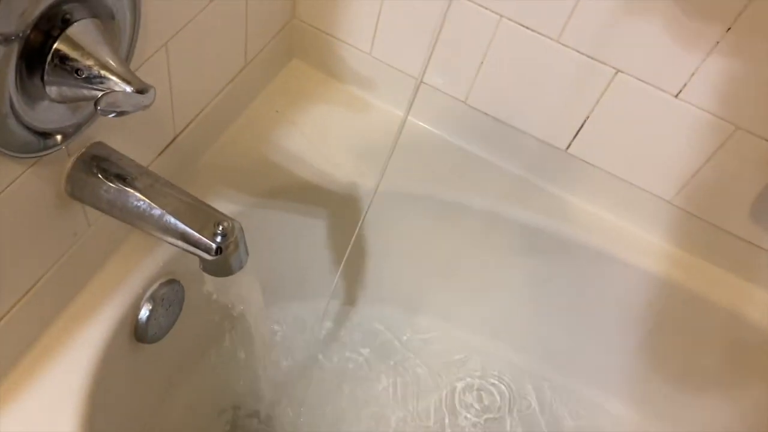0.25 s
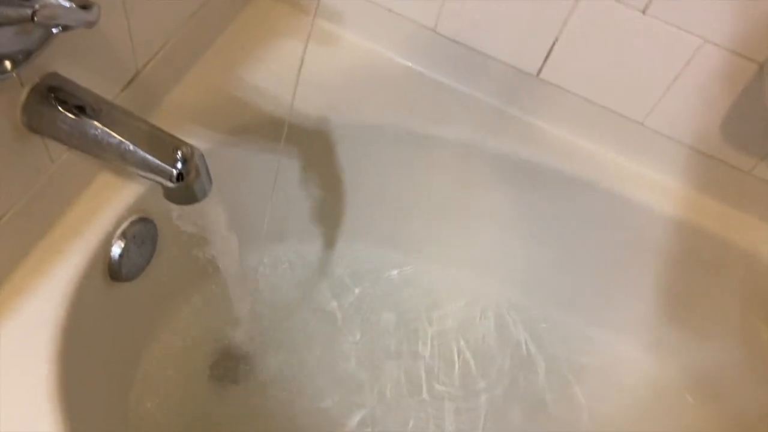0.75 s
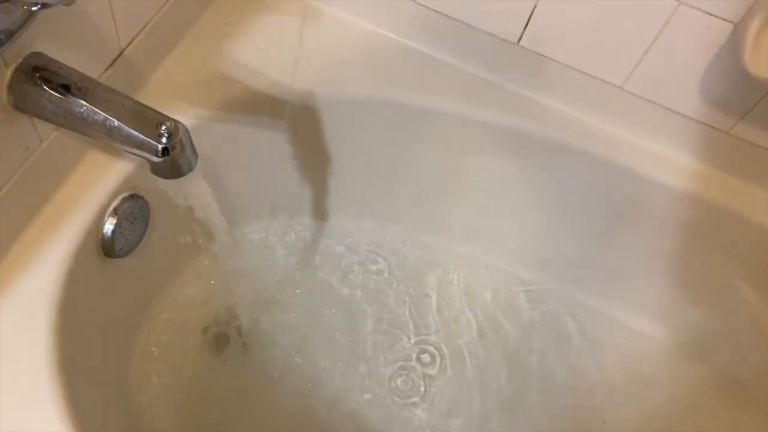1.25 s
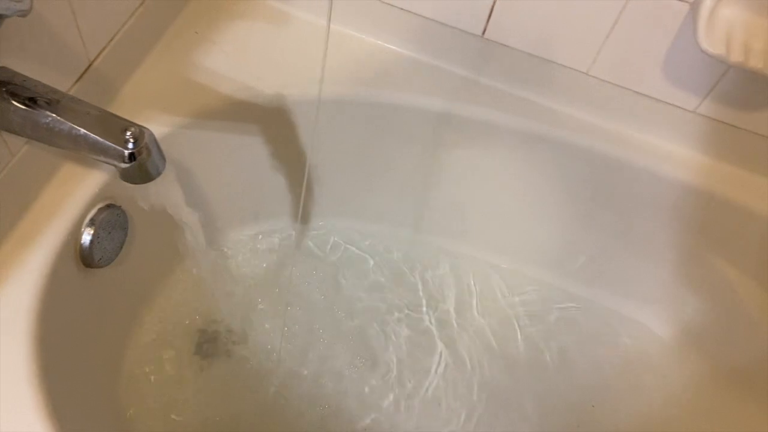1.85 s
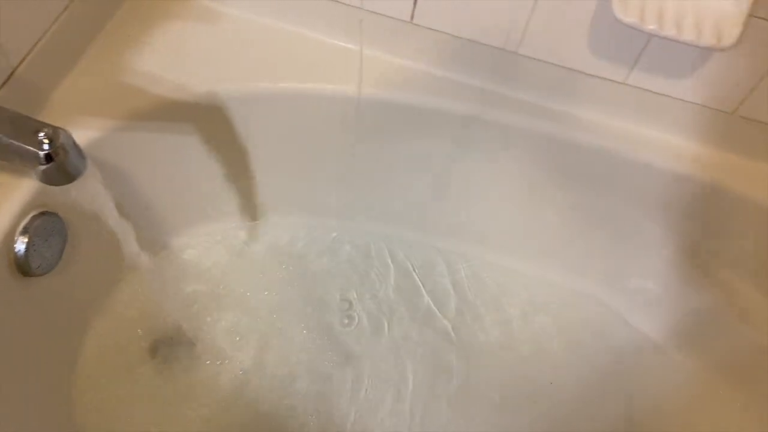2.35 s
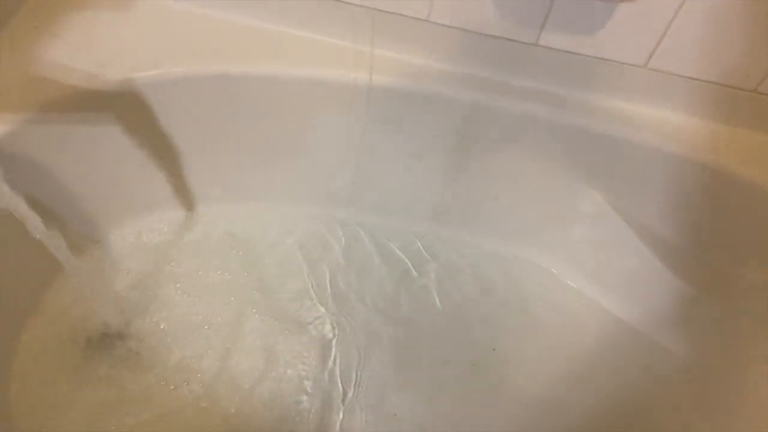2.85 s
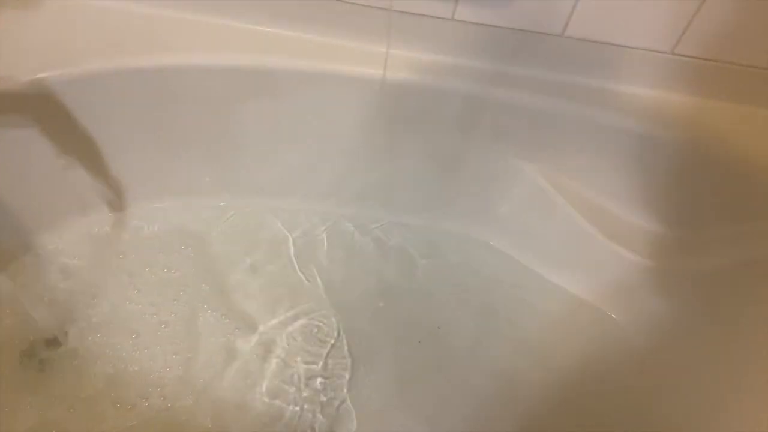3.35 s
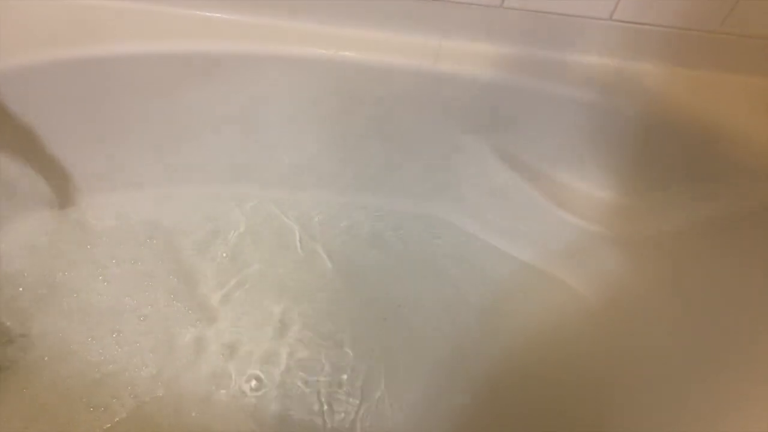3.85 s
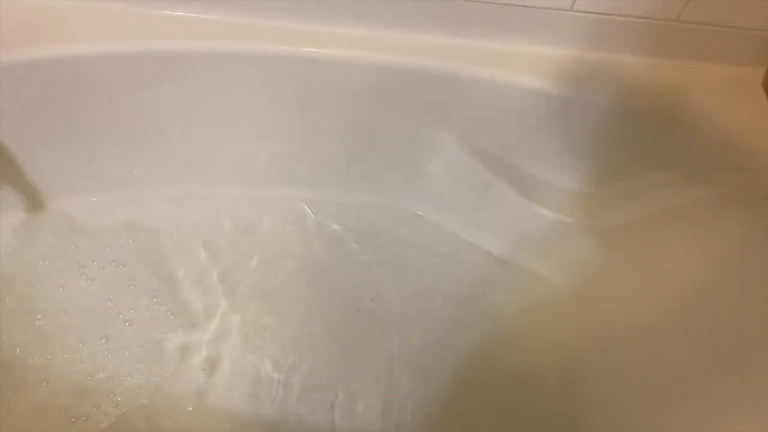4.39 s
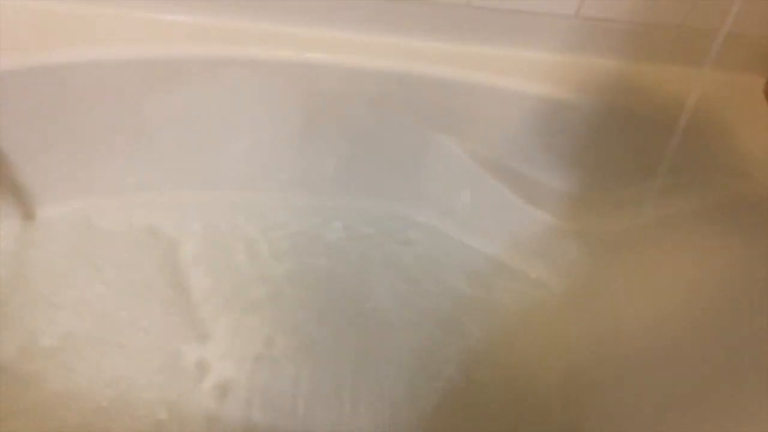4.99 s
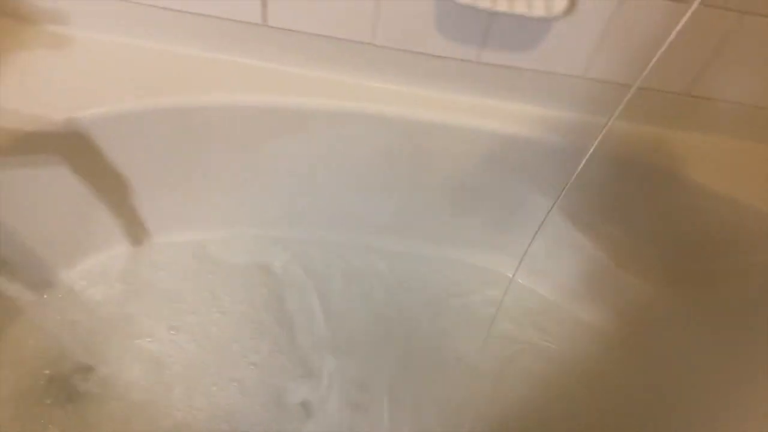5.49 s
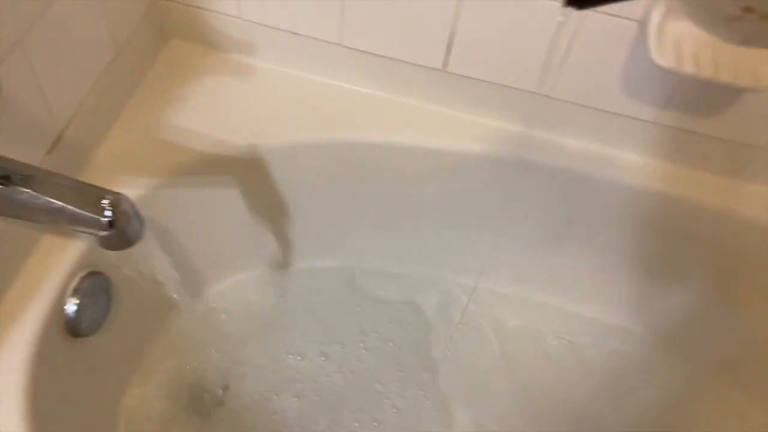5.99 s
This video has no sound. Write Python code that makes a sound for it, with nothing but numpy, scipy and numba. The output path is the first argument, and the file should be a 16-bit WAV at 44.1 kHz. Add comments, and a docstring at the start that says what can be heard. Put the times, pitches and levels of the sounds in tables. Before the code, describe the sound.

Heard from close by in a small tiled bathroom, a strong stream of water pours from a faucet into a filling bathtub without a break. The plunging water makes a hollow rumble beneath bright bubbling and crackling spray. Sharp splashes stand out at first, followed by irregular gurgles, smaller slaps and gulps of air, and the low churning grows briefly just before the end.

```python
"""A bathtub faucet runs at full flow into a filling tub in a tiled bathroom.
From the outset the jet drives air under the water, which booms in the tub and room, while clouds of
bubbles ring and fine spray crackles. In the first second lumps of the jet slap the surface hardest.
Slaps, gurgles and gulps of air then recur unevenly over the steady rush. Near six seconds the
churning swells, and a last gulp booms."""
import sys
import numpy as np
from scipy import signal
from scipy.fft import rfft, irfft, next_fast_len
from scipy.io import wavfile
from scipy.ndimage import uniform_filter1d, map_coordinates
from numba import njit

SR = 44100
rng = np.random.default_rng(int(sys.argv[2]) if len(sys.argv) > 2 else 0)


def unload_audio(sound):
    """Save the sound as a 16-bit wav file, at the path given as the first command line argument."""
    columns = np.transpose(np.atleast_2d(sound))
    # keep every value between -1 and 1, then stretch to whole-number steps
    steps = np.round(np.clip(columns, -1, 1) * 32767)
    wavfile.write(sys.argv[1], SR, steps.astype(np.int16))


N = 274743


def gain_of(db):
    """The decibel scale: 20 dB is a factor of ten in amplitude."""
    return 10 ** (np.asarray(db) / 20)


def unit_rms(x):
    """Normalisation to a mean power of one."""
    return x / np.sqrt(np.mean(x ** 2) + 1e-20)


def curve_at(points, hz):
    """Linear interpolation of (Hz, value) points on a logarithmic frequency axis."""
    point_hz, value = np.transpose(points)
    return np.interp(np.log(hz + 1), np.log(point_hz + 1), value)


def filtered(x, response):
    """Linear filtering: the spectrum is multiplied by a frequency response."""
    size = next_fast_len(x.shape[-1] + 4096, True)
    spectrum = rfft(x, size) * response(np.fft.rfftfreq(size, 1 / SR))
    return irfft(spectrum, size)[..., :x.shape[-1]]


def coloured(x, points):
    """Spectral shaping by a curve of (Hz, dB) points."""
    return filtered(x, lambda hz: gain_of(curve_at(points, hz)))


def split(x, edges_hz):
    """Complementary filtering: neighbouring bands that sum to the whole."""
    lows = [filtered(x, lambda hz: 1 / (1 + (hz / edge) ** 12)) for edge in edges_hz]
    return np.diff([0 * x, *lows, x], axis=0)


def wander(per_s):
    """Random modulation of rms 1, gliding to a new value per_s times a second."""
    steps = rng.standard_normal(4096)
    return unit_rms(np.interp(np.arange(N) / SR * per_s, np.arange(len(steps)), steps))


def add(mix, start_s, sound):
    """Superposition: a signal joins the mix at its starting time."""
    part = mix[:, max(round(start_s * SR), 0):][:, :sound.shape[1]]
    part += sound[:, :part.shape[1]]


def impacts(per_s, spread_db, size=N):
    """A Poisson process: clicks of uneven strength, with a random sign in each channel."""
    at = np.flatnonzero(rng.random(size) < per_s / SR)
    strength = gain_of(spread_db * np.minimum(rng.exponential(1, len(at)), 4))
    train = np.zeros((2, size))
    train[:, at] = strength * rng.choice([-1, 1], (2, len(at)))
    return train


@njit
def damped_tones(start, turn, fade, glide, strength, size):
    """Damped oscillators as shrinking phasors that turn ever faster; time is counted in samples."""
    out = np.zeros((2, size))
    for k in range(len(start)):
        phasor = 1 + 0j
        step, bend = np.exp(1j * turn[k] - fade[k]), np.exp(1j * glide[k])
        for n in range(start[k], min(start[k] + int(5 / fade[k]), size)):
            phasor *= step
            step *= bend
            out[0, n] += strength[k, 0] * phasor.imag
            out[1, n] += strength[k, 1] * phasor.imag
    return out


def bubbles(birth_s, hz, amplitude, cycles, rise):
    """Bubble resonance: in `cycles` periods a tone falls to 1/e and sharpens by the fraction `rise`."""
    turn, fade = 2 * np.pi * hz / SR, hz / (SR * cycles)
    glide = turn * fade * rise  # pitch climbs as the bubble nears the surface
    strength = (2 * np.sqrt(fade) * amplitude)[:, None] * rng.choice([-1, 1], (len(birth_s), 2))
    return damped_tones((birth_s * SR).astype(np.int64), turn, fade, glide, strength, N)


def echoes(tub_db=-4.0, tub_t60_s=0.075, room_db=-6, room_t60_s=0.25):
    """Impulse response from one spot on the water: quick tub reflections and the tiled room's decay."""
    t = np.arange(SR // 3) / SR
    response = np.zeros((2, len(t)))
    for db, t60 in [(tub_db, tub_t60_s), (room_db, room_t60_s)]:
        taps = impacts(3000, 0, size=len(t)) * (t > .0015) * gain_of(-60 * t / t60)
        response += gain_of(db) * taps / np.linalg.norm(taps, axis=1, keepdims=True)
    return response


def bathroom(direct, shifts_per_s=9, spots=6):
    """Time-varying reverberation: the echoes change as the splashing shifts about on the water."""
    shares = np.array([wander(shifts_per_s) for _ in range(spots)])
    shares /= np.linalg.norm(shares, axis=0)
    return direct + sum(signal.oaconvolve(direct * share, echoes(), axes=1)[:, :N] for share in shares)


def stereo_image(pair):
    """Coherence: left and right are partly alike; in the high treble they are fully alike,
    alternately in phase and opposite."""
    # Each row: frequency in Hz, coherence (clipped to 0-1 below).
    coherence = [(60, 1.5), (140, 0.77), (300, 0.92), (550, 0.52), (800, 0.22), (950, 0.4), (1120, 0),
                 (1350, 0.52), (1600, 0.3), (1750, 0.44), (2200, 0.26), (2550, 0.8), (3400, 0.36),
                 (4600, 0.65), (5600, 0.1), (6300, 0.27), (7100, 1), (8300, 0.3), (8500, 3), (15000, 3)]
    # Each row: frequency in Hz, left minus right phase in radians.
    phase_difference = [(0, 0), (520, 0.7), (950, 0.7), (1460, -3.5), (2580, -6.0), (7410, -6.3),
                        (8350, -9.1), (9650, -9.7), (10500, -12.5), (11700, -12.6), (12600, -15.5),
                        (14000, -15.9), (14600, -18.9), (16500, -18.8)]
    # Each row: frequency in Hz, left minus right level in dB.
    balance = [(60, -0.5), (110, -3), (200, 0), (380, -2), (750, 3), (1000, 2), (1250, 0.5), (1700, 1.2),
               (2200, 4.5), (2700, 1.5), (4800, 2.5), (8120, 1.5), (15000, 0)]
    alike = lambda hz: np.clip(curve_at(coherence, hz), 0, 1)
    rotation = lambda hz: np.exp(-1j * np.interp(hz, *np.transpose(phase_difference)))
    tilt = lambda hz: gain_of(np.array([[.5], [-.5]]) * curve_at(balance, hz))
    left, unrelated = pair
    right = filtered(left, lambda hz: alike(hz) * rotation(hz))
    right += filtered(unrelated, lambda hz: np.sqrt(1 - alike(hz) ** 2))
    return filtered(np.array([left, right]), tilt)


def foam(flutter_db=1, flutters_per_s=110):
    """Incoherent summation: foam too fine to tell apart is noise that flutters with the jet."""
    return unit_rms(rng.standard_normal((2, N)) * gain_of(flutter_db * wander(flutters_per_s)))


def spray(per_s, spread_db, bursts_per_s, burst_db, burst_s, drizzle):
    """Shot noise: drops tick on the water in short bursts over a steady drizzle."""
    age = np.arange(SR // 16) / SR / burst_s
    onsets = abs(impacts(bursts_per_s, burst_db)[0])
    bursts = signal.oaconvolve(onsets, np.sqrt(age) * np.exp(-age))[:N]
    return unit_rms(impacts(per_s, spread_db) * (drizzle + unit_rms(bursts)))


def plinks(level_db=-14, middle_hz=2600, octaves=1.15, spread_db=3.0, count=700):
    """Light damping: single clean bubbles at the edge of the foam ring longer than the rest."""
    when, down, up, luck = rng.random((count, 4)).T
    hz = middle_hz * 2 ** (octaves * (up - down))
    amplitude = gain_of(-spread_db * np.log(np.maximum(luck, .15)))
    return gain_of(level_db) * unit_rms(bubbles(when * N / SR, hz, amplitude, cycles=34, rise=0.0278))


def churn(lowest_hz=340, spread_db=3, cloud_db=1.43, clouds_per_s=35, clouds_per_octave=2.52,
          count=36000):
    """A broad population of resonators: bubbles of neighbouring sizes are born in short clouds."""
    when, height, luck = rng.random((count, 3)).T
    birth_s, octave = when * N / SR, height * 5
    hz = lowest_hz * 2 ** octave
    place = [birth_s * clouds_per_s, octave * clouds_per_octave]
    clouds = map_coordinates(rng.standard_normal((1024, 64)), place, order=1, mode="wrap")
    db = cloud_db * np.minimum(clouds, 2) - spread_db * np.log(np.maximum(luck, .03))
    amplitude = np.sqrt(hz) * gain_of(db)  # equal energy per Hz on average
    return unit_rms(bubbles(birth_s, hz, amplitude, cycles=10, rise=0.0495))


def steady_rush():
    """Independent sources add in power: foam, bubbles, drops and mist each fill part of the spectrum."""
    # Each row of these four spectra: frequency in Hz, gain in dB.
    foam_share = [(400, -0.5), (1500, -2.5), (4000, -2), (8000, -4.5), (15000, 2)]
    bubble_share = [(400, -3), (1500, -2), (4000, -4.5), (8000, -2.5), (15000, -5)]
    drop_share = [(400, -18), (1500, -9.5), (4000, -4), (7000, -1.5), (10000, -13), (15000, -15)]
    mist_share = [(400, -39), (4000, -18), (8000, -1), (11000, -2.5), (15000, 0)]
    drops = spray(per_s=5000, spread_db=5.0, bursts_per_s=110, burst_db=2.0, burst_s=0.0033, drizzle=0.61)
    mist = spray(per_s=4000, spread_db=3.0, bursts_per_s=99, burst_db=3.0, burst_s=0.0016, drizzle=0.5)
    layers = [(foam(), foam_share), (churn(), bubble_share), (drops, drop_share), (mist, mist_share)]
    return sum(coloured(layer, share) for layer, share in layers)


def surging(water, shared_db=0.44, own_db=0.43, swings_per_s=32, width_octaves=1.23):
    """Amplitude modulation by band: each lurch of the jet lifts the bubbles near one pitch."""
    # Each row: peak time in seconds, half-length in seconds, swell in dB, middle pitch in Hz.
    surges = [(0.05, 0.07, 5, 1300), (0.37, 0.047, 4.5, 800), (0.567, .1, 1.5, 5000),
              (0.765, 0.084, 3.2, 3600), (0.98, 0.049, 1.5, 2200), (1.21, 0.12, 1, 2100),
              (1.488, 0.29, 1.5, 1900), (2.14, 0.039, 1.5, 2600), (2.97, .06, 3, 750),
              (3.153, 0.052, 4, 1700), (3.452, 0.056, 4.5, 1800), (3.808, 0.049, 4, 1500),
              (4.23, 0.053, 3.5, 600), (4.6, 0.11, 1, 4200), (4.746, 0.032, 3.5, 700),
              (4.827, 0.095, 2.3, 2200), (5.228, 0.078, 1, 1600), (5.4, 0.075, 2.5, 700),
              (5.573, 0.041, 2.5, 4000), (5.87, 0.49, 0, 1600)]
    # Each row: time in seconds, slow level change of the breaking water in dB.
    pour = [(0, 0.4), (1.35, 0.5), (1.8, -0.34), (2.35, -0.3), (3.2, -1), (3.95, -0.56), (4.7, -0.1),
            (5.5, -0.8), (6.23, 0)]
    # Each entry: centre of a band in Hz.
    band_centres = [600, 1200, 2400, 4800, 9600]
    t, centres = np.arange(N) / SR, np.array(band_centres)
    peak_s, half_s, db, hz = np.transpose(surges)
    time_weight = np.maximum(1 - abs(t - peak_s[:, None]) / half_s[:, None], 0)
    band_weight = np.exp(-.5 * (np.log2(centres[:, None] / hz) / width_octaves) ** 2)
    swells_db = (band_weight * db) @ time_weight + np.interp(t, *np.transpose(pour))
    swells_db += shared_db * wander(swings_per_s)
    bands = split(water, np.sqrt(centres[1:] * centres[:-1]))
    return sum(band * gain_of(swell + own_db * wander(swings_per_s))
               for band, swell in zip(bands, swells_db))


def spits(level_db=7, fade_s=.004, per_s=4000, highpass_hz=7000):
    """Impact noise: each handful of drops thrown onto the surface lands as a brief, bright crackle."""
    # Each row: time in seconds, relative level in dB.
    handfuls = [(0.112, 16.5), (0.62, 8), (0.695, 15), (0.735, 9), (0.767, 6), (0.908, 9), (0.929, 14),
                (1.34, 10), (1.737, 15), (1.832, 16), (2.511, 17), (2.604, 14), (3.004, 14), (3.307, 8),
                (3.547, 16), (3.589, 14), (3.629, 14), (3.876, 12), (3.987, 12), (4.056, 16), (4.083, 17),
                (4.382, 12), (4.457, 16), (4.577, 9), (5.011, 12), (5.316, 10), (5.374, 17.5), (5.442, 9),
                (5.568, 13), (6.122, 15), (6.2, 12)]
    out, age = np.zeros((2, N)), np.arange(SR // 16) / SR / fade_s
    for time_s, db in handfuls:
        ticks = unit_rms(impacts(per_s, spread_db=1.1, size=len(age)))
        add(out, time_s - fade_s / 2, gain_of(db + level_db) * ticks * age * np.exp(-age))
    return filtered(out, lambda hz: hz ** 2 / (hz ** 2 + highpass_hz ** 2))


def gurgles(level_db=-0.8, taper=0.25, count=24):
    """Size sets pitch: trapped air breaks into a run of like-sized bubbles that ring in one band."""
    # Each row: start in seconds, length in seconds, pitch in Hz, fractional scatter, relative level in dB.
    runs = [(0.335, 0.06, 2480, .05, 4), (0.5, 0.21, 2380, 0.1, 4.5), (0.37, 0.069, 795, 0.35, 5),
            (0.5, 0.9, 532, 0.019, 8), (0.745, .07, 3350, .16, 6.5), (0.765, .06, 531, 0.043, 16.5),
            (0.915, 0.12, 1970, .08, 5), (0.93, .17, 1284, 0.13, 4), (1.15, 0.083, 1884, .18, 5.5),
            (1.45, 0.17, 1320, 0.049, 6), (1.48, 0.12, 3070, .05, 1), (2.94, 0.064, 1257, 0.1, 1),
            (3.7, .15, 1740, 0.096, -7), (4.26, 0.2, 2456, 0.059, 5), (4.5, 0.66, 2560, 0.026, -0.5),
            (4.82, 0.072, 1530, 0.063, 5), (5.225, 0.072, 2210, 0.28, -1), (5.72, 0.27, 1644, .13, 2),
            (5.82, 0.22, 1250, 0.1, -1)]
    start, length, pitch, scatter, db = np.repeat(runs, count, axis=0).T
    when, blur, detune = rng.random((len(start), 3)).T
    birth_s = start + length * (when + taper * (blur - when))  # sets in and thins out softly
    hz = pitch * np.exp(scatter * (2 * detune - 1))
    bandwidth_hz = 2 * scatter * pitch
    energy_share = abs(2 * length * bandwidth_hz) / count
    return bubbles(birth_s, hz, gain_of(db + level_db) * np.sqrt(energy_share), cycles=24, rise=0.014)


def slaps(level_db=27, scatter=0.1, weakening=1.74, count=14):
    """Air entrainment: a lump of the jet slaps down and traps a cluster of bubbles, strongest first."""
    # Each row: start in seconds, pitch in Hz, relative level in dB, stragglers' delay scale in seconds.
    lumps = [(0.113, 2650, 9.5, 0.0047), (0.318, 2520, 14, .002), (0.385, 680, 5, 0.0053),
             (0.737, 3070, 15, 0.0038), (0.759, 4180, 9, .005), (0.78, 980, 8, 0.007),
             (0.909, 1940, 13.5, .003), (0.934, 2040, 8, 0.0033), (0.962, 1880, 3, .004),
             (0.975, 1130, 3, .004), (1.001, 2220, 3, .003), (1.017, 1980, 3, 0.0027),
             (1.193, 1330, 3, .004), (1.194, 2040, 5, 0.0047), (1.318, 3020, 7.5, .004),
             (1.444, 2490, 11, .003), (1.506, 3050, 4, .004), (1.524, 1310, 3, .004),
             (1.563, 1320, 5, .004), (1.866, 5570, 7, 0.0026), (1.936, 5570, 5, .003),
             (2.078, 3000, 6, 0.0035), (2.144, 2700, 4, .004), (2.717, 1586, 9, .0015),
             (2.721, 1940, 10.5, .0015), (2.966, 1156, 5, .004), (2.975, 1750, 6, .005),
             (3.146, 1550, 7.5, .005), (3.168, 1540, 7, 0.0046), (3.188, 4700, 6.5, 0.0052),
             (3.299, 2750, 5.5, 0.0044), (3.429, 1540, 6.5, 0.0039), (3.459, 5120, 4, 0.0046),
             (3.584, 5720, 2.5, .006), (3.63, 2550, 8, 0.0038), (3.732, 1680, 2.5, 0.0035),
             (3.82, 1617, 5, 0.0038), (3.934, 3560, 9, 0.0019), (3.985, 7600, 7, 0.0047),
             (4.467, 807, 6, .004), (4.729, 4060, 6, .004), (4.855, 1530, 4, 0.004), (4.861, 5700, 6, .006),
             (4.862, 3970, 6, 0.011), (5.063, 3020, 4, .008), (5.149, 5560, 6, .005),
             (5.226, 1790, 7, .0039), (5.267, 3290, 7, .004), (5.277, 2300, 4, .004),
             (5.402, 2840, 5, 0.005), (5.517, 1072, 5, .004), (5.688, 1110, 6, .004), (5.9, 1630, 5, .004)]
    start, pitch, db, lag = np.repeat(lumps, count, axis=0).T
    rank = np.tile(np.arange(count), len(lumps))
    straggler = rank > 0
    early, late, detune = rng.random((len(start), 3)).T
    delay = abs(lag * np.log(early * late + 0.0014)) * straggler  # they crowd in, then thin out
    hz = pitch * np.exp(scatter * (2 * detune - 1) * straggler)
    amplitude = gain_of(db + level_db) * np.sqrt(pitch / SR / (rank + 1) ** weakening)
    return bubbles(start + delay, hz, amplitude, cycles=14, rise=0.014)


def breaking_water():
    """Source and filter: all the splashing reverberates and takes on one broad spectral envelope."""
    # Each row: frequency in Hz, gain in dB; it falls gently above the bubbles' peak.
    colour = [(150, -17), (330, -5.5), (450, -3), (700, -3), (1080, -4), (1300, -0.46), (1430, -1.5),
              (1850, -4.5), (2150, -6), (2500, -7), (2750, -9.5), (3100, -9), (3600, -10.5), (4300, -11.5),
              (4600, -10), (5000, -11.5), (6000, -13.5), (8000, -16), (11000, -17.5), (15500, -23.5)]
    splashing = surging(steady_rush() + plinks()) + slaps() + gurgles() + spits()
    return unit_rms(coloured(bathroom(splashing), colour))


def gulping(rise_s=0.05, fade_s=0.055, swings_per_s=14):
    """Addition of powers: gulps of air over uneven churning give the envelopes of four low bands."""
    # Each row: peak time in seconds, then relative levels of thud, boom, drone and gurgle in dB.
    gulps = [(0.21, -31, -32, -50, -56), (0.4, -38, -32, -33.5, -49), (0.45, -36, -52, -48, -50),
             (0.55, -50, -53, -37.5, -50), (0.66, -53, -35, -39, -44), (0.75, -34, -34, -37, -57),
             (0.86, -37, -53, -44, -33.5), (1.07, -55, -32.5, -41, -38), (1.36, -34, -32, -50, -36.5),
             (1.535, -36, -24.5, -32, -46), (1.66, -36, -47, -50, -47), (1.75, -50, -34, -52, -56),
             (2.04, -31, -29, -52, -49), (2.125, -44, -29, -47, -37), (2.2, -50, -33.5, -43, -35),
             (2.555, -33, -30, -35, -31.5), (2.64, -38, -32, -37, -37), (2.775, -47, -30, -31, -41),
             (2.85, -39, -39, -37, -47), (2.99, -48, -40, -49, -32.5), (3.1, -38, -39, -37, -38),
             (3.22, -37, -46, -36, -38), (3.3, -50, -46, -50, -42), (3.4, -35, -38, -54, -50),
             (3.47, -40, -37, -41, -52), (3.95, -45, -34, -54, -34.5), (4.1, -39, -42, -52, -35),
             (4.25, -40, -28, -52, -30), (4.34, -41, -33, -55, -35), (4.47, -35, -37, -52, -35),
             (4.74, -35, -41, -54, -42), (4.84, -39, -39, -48, -32), (4.96, -41, -27.5, -46, -40),
             (5.17, -40, -35, -34.5, -54), (5.275, -49, -29, -53, -56), (5.37, -52, -52, -36, -40),
             (5.46, -50, -48, -35, -43), (5.57, -48, -31, -60, -52), (5.78, -47, -34, -45, -34),
             (5.86, -48, -42, -36.5, -54), (6.17, -40, -29.5, -51, -39.5)]
    # Each row, thud to gurgle: relative level between gulps in dB, share of churning, random swing in dB.
    rumble = [(-39.5, 0.25, 1.2), (-38, 1, 1), (-42.5, 1, 1.2), (-41.5, 0.46, 2)]
    # Each row: time in seconds, strength of the jet's churning in dB.
    churning = [(0, 2), (0.85, 0), (1.2, -3), (1.45, -0.5), (1.85, 0.5), (2.15, 1.5), (2.33, -3.5),
                (2.62, 2), (3.2, 0.5), (3.7, -1), (4.35, 0), (4.65, 0), (5.2, -3), (5.65, -3), (5.9, 4.5),
                (6.23, -3)]
    churning_db = np.interp(np.arange(N) / SR, *np.transpose(churning))
    power = np.array([gain_of(db + share * churning_db + swing_db * wander(swings_per_s)) ** 2
                      for db, share, swing_db in rumble])
    age = np.arange(-SR // 8, SR // 2) / SR
    swell = np.exp(-(age / np.where(age < 0, rise_s, fade_s)) ** 2)
    for peak_s, *levels_db in gulps:
        add(power, peak_s + age[0], np.outer(gain_of(levels_db), swell) ** 2)
    return np.sqrt(power)


def plunge(smoothing_s=0.094, murmur_db=-44):
    """Forced resonance: air churned under the jet drives the low modes; higher ones murmur evenly."""
    # Each row, a mode of tub and room: frequency in Hz, width in Hz, relative level in dB.
    modes = [(35, 10, -28), (57, 13.2, 1.5), (93, 15, -2), (141, 12.5, 7.5), (176, 19, -12),
             (197, 30, -9.5), (244.3, 10.3, -3.5), (272, 19, -13), (299, 16, -4), (336, 30, -11),
             (377.6, 28, -16.5), (419.4, 50, -12), (470, 20, -26), (539, 22, -11.5), (565, 16, -22),
             (669, 27, -17)]
    # Each entry: upper edge in Hz of the thud, boom, drone and gurgle bands in turn.
    band_edges = [112, 215, 275, 385]
    resonance = lambda hz: np.sqrt(sum((gain_of(db) / (1 + (2 * (hz - centre) / width) ** 2)) ** 2
                                       for centre, width, db in modes))
    ringing = filtered(rng.standard_normal((2, N)), resonance)
    *low_bands, murmur = split(ringing, band_edges)
    out = gain_of(murmur_db) * unit_rms(murmur)
    for band, envelope in zip(low_bands, gulping()):
        power = uniform_filter1d(band ** 2, int(smoothing_s * SR))
        power = uniform_filter1d(power, int(smoothing_s * SR / 2))
        out += envelope * band / np.sqrt(abs(power) + 1e-12)  # the jet alone sets the swells
    return out


def scene(water_db=-28.5, plunge_db=-1.0):
    """Superposition: breaking water surges above the boom of the plunge."""
    return stereo_image(gain_of(water_db) * breaking_water() + gain_of(plunge_db) * plunge())


def record(dry, cutoff_hz=15800):
    """Band limiting: a linear-phase low-pass filter removes the highest treble."""
    lowpass = signal.firwin(511, cutoff_hz, window=("kaiser", 9), fs=SR)
    return signal.oaconvolve(dry, lowpass[None], "same")


dry = scene()
out = record(dry)
unload_audio(out)
```